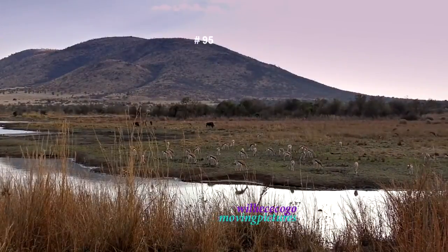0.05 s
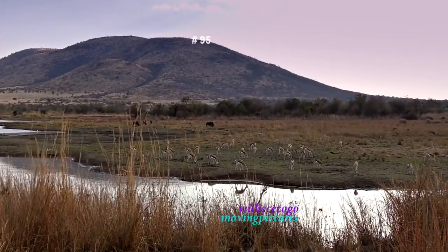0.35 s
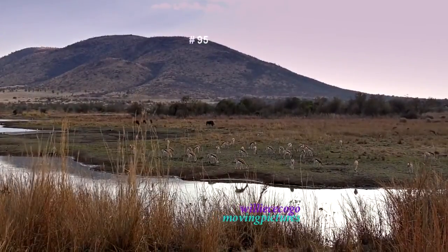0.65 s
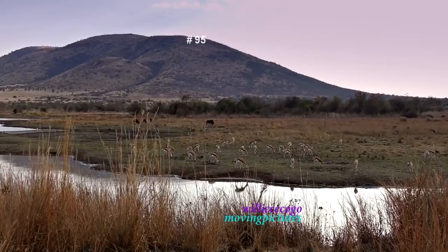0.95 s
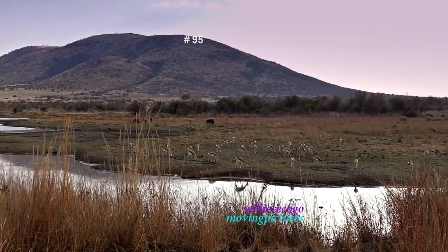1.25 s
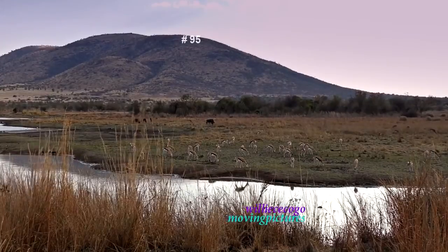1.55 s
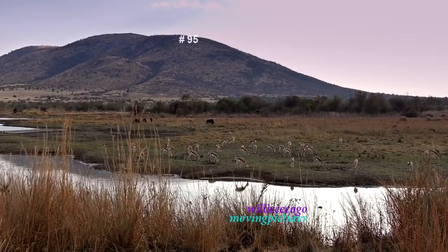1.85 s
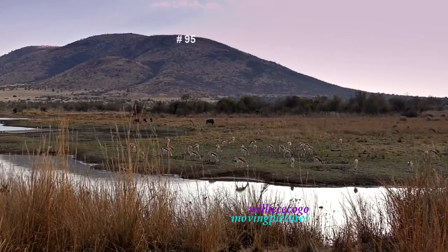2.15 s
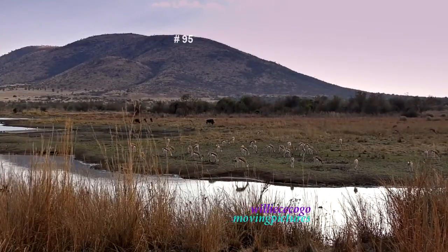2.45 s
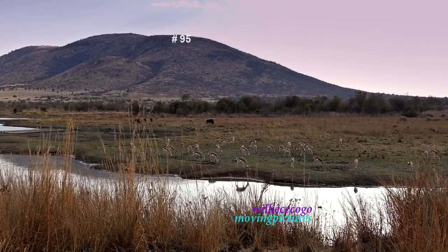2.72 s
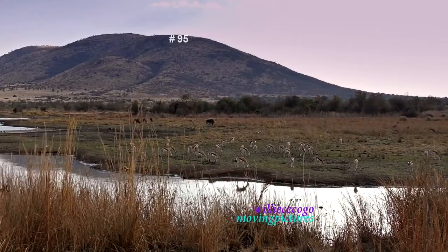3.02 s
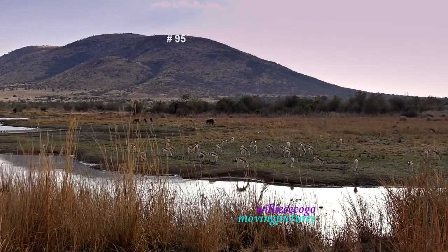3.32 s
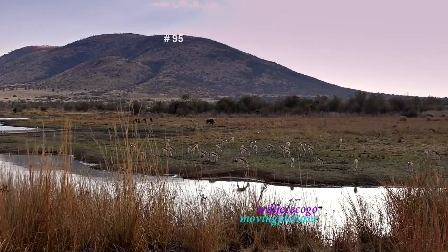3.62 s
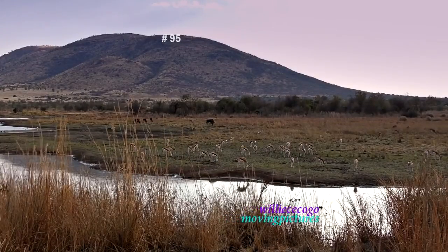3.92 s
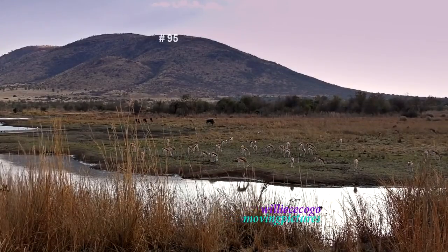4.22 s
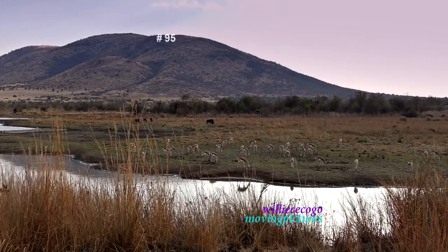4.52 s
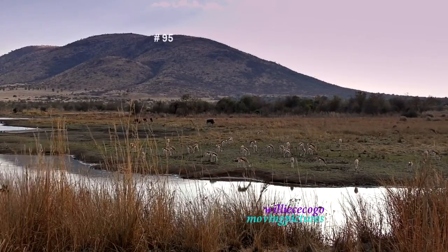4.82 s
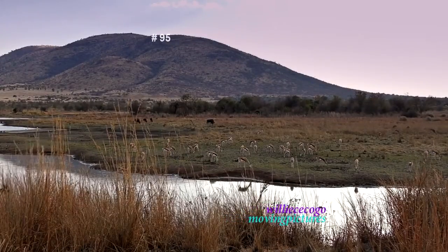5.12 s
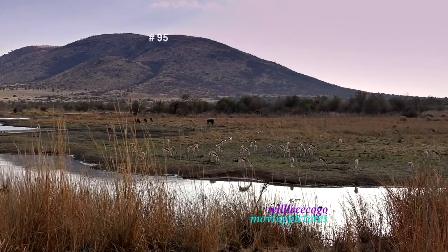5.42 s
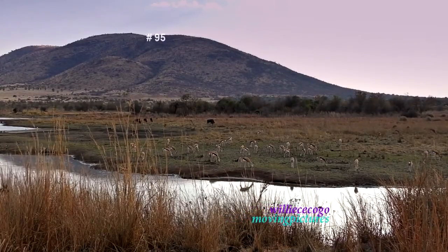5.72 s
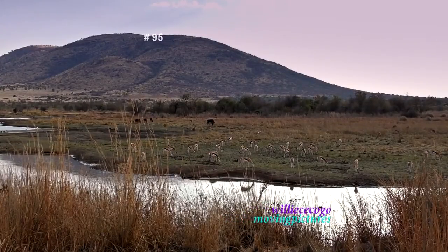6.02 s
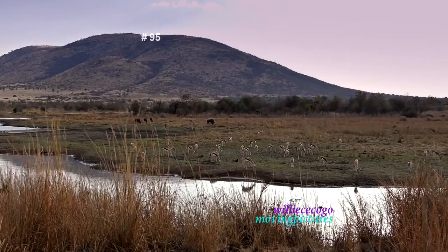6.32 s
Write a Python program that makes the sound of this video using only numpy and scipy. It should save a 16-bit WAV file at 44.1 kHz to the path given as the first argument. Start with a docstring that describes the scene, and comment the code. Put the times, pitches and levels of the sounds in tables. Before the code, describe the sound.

At an open river's edge, a long rising cry starts a loud duet of yelps between two large birds, centred and lightly echoing. After a brief gap they yelp again, then stop. Quieter twitters, chips and trills run behind them, joined by distant whistles and chatter, before fading too. A wide, quiet hush of air lies underneath throughout, with a faint steady drone and a few soft thuds.

```python
"""Two large birds yelp a ringing, overlapping duet across a river. Each voice is a nearly pure syrinx
tone that scoops up, breaks between registers and turns hoarse when the two sides of the syrinx beat.
Behind them a small bird twitters in threes, others chip and whistle, and a marsh chorus trills, then
dies away. The banks throw back a thin echo. Under it all lie open-air hush, a faint steady drone
and a few low thuds."""
import sys
import numpy as np
from scipy import signal
from scipy.fft import rfft, irfft
from scipy.io import wavfile
from scipy.ndimage import uniform_filter1d

SR = 44100
rng = np.random.default_rng(int(sys.argv[2]) if len(sys.argv) > 2 else 0)


def file_out(sig):
    """Save sig as 16-bit WAV at sys.argv[1]."""
    # one column per channel
    cols = np.atleast_2d(sig).T
    # limit, then scale
    lim = np.clip(cols, -1, 1)
    pcm = np.round(lim * 32767).astype(np.int16)
    wavfile.write(sys.argv[1], SR, pcm)


N = 285282
TIME = np.arange(N) / SR


def from_db(db):
    """Decibels to gain."""
    return 10 ** (np.asarray(db) / 20)


def unit(x):
    """Scales to rms 1."""
    return x / np.sqrt(np.mean(x ** 2) + 1e-20)


def at_freq(points, hz):
    """Reads a table on a log-frequency axis."""
    f, value = np.transpose(points)
    return np.interp(np.log(hz + 1), np.log(f + 1), value)


def add(mix, s, sound):
    """Lays a sound into the mix at s seconds."""
    start = round(s * SR)
    part = mix[max(start, 0):max(start + len(sound), 0)]
    part += sound[max(-start, 0):][:len(part)]


def add_chirp(mix, s, length, hz, db, fall, arch=0):
    """A soft-edged whistle centred on s whose pitch falls by the share fall, ever faster if arched."""
    u = np.linspace(-.5, .5, max(int(length * SR), 2))
    phase = 2 * np.pi * np.cumsum(hz * (1 - fall * u - arch * u ** 2)) / SR
    add(mix, s - length / 2, np.sqrt(2) * from_db(db) * np.cos(np.pi * u) ** 2 * np.sin(phase))


def band_noise(centre_hz, width_hz):
    """Noise of rms 1 in a bell-shaped band; centred on zero it is a random wander."""
    hz = np.fft.rfftfreq(N, 1 / SR)
    bell = np.exp(-.5 * ((hz - centre_hz) / width_hz) ** 2)
    return unit(irfft(rfft(rng.standard_normal(N)) * bell, N))


def noise_frames(spectrum, patchy_db):
    """Bin frequencies and two unrelated short-time noise spectra that share drifting patches."""
    hz = np.fft.rfftfreq(2048, 1 / SR)
    a, b, c, d, patches = rng.standard_normal((5, N // 512 + 5, len(hz)))
    patches = unit(uniform_filter1d(uniform_filter1d(patches, size=8, axis=0), size=20, axis=1))
    gain = from_db(at_freq(spectrum, hz) + patchy_db * patches)
    return hz, gain * (a + 1j * b), gain * (c + 1j * d)


def to_sound(frames):
    """Short-time spectra to a signal of rms 1."""
    return unit(signal.istft(np.swapaxes(frames, -1, -2), nperseg=2048, noverlap=1536)[1][..., :N])


# tone colour of the air bed: f/Hz, relative level/dB
HUSH_SPECTRUM = [(15, -48), (25, -12.5), (140, -2.5), (233, -9), (331, -10), (368, -14), (552, -15.5),
                 (614, -21.5), (722, -20.5), (782, -23.5), (1140, -14), (3440, -21.5), (6550, -30),
                 (10600, -27.5), (15500, -28)]
# its stereo width: f/Hz, left-right correlation
HUSH_CORRELATION = [(30, 0.7), (130, 0.25), (300, 0.11), (1300, 0.073), (3000, 0.16), (7000, 0.12),
                    (15000, 0.55)]
# its pan: f/Hz, left over right/dB
HUSH_PAN = [(60, -4), (130, -3.5), (350, -0.5), (700, -5.5), (1290, -2), (2400, 0.5), (4400, 0),
            (8100, -3.5), (15000, -5.5)]

def hush(level_db=-65.5):
    """A wide bed of open-air noise with hiss on top."""
    hz, left, other = noise_frames(HUSH_SPECTRUM, patchy_db=1.0)
    shared = at_freq(HUSH_CORRELATION, hz)
    right = shared * left + np.sqrt(1 - shared ** 2) * other
    pan = from_db(at_freq(HUSH_PAN, hz) / 2)
    return from_db(level_db) * to_sound(np.array([left * pan, right / pan]))


# drone partials: f/Hz, opening level/dB, closing level/dB
DRONE_PARTIALS = [(52, -88.5, -80.5), (96.6, -78.5, -81), (146.3, -87.5, -77), (223.8, -90, -82),
                  (339, -83.5, -101)]

def drone(waver=0.01198, swell_db=3.5):
    """A distant drone of low sines, each wandering in pitch and level."""
    out = np.zeros(N)
    for hz, first_db, last_db in DRONE_PARTIALS:
        phase = 2 * np.pi * np.cumsum(hz * (1 + waver * band_noise(0, 2.67))) / SR
        level = from_db(np.linspace(first_db, last_db, N) + swell_db * band_noise(0, 3.4))
        out += np.sqrt(2) * np.sin(phase) * level
    return out


# tone colour of the chorus wash: f/Hz, relative level/dB
WASH_SPECTRUM = [(100, -16), (300, -2.5), (700, -2), (1500, 0.5), (2200, -5), (3000, -12.5), (3750, -9.5),
                 (4300, 0), (4750, -2), (5150, -19), (6000, -16.5), (6700, -7.5), (7400, -30),
                 (15000, -48.5)]
# fader ride on the whole chorus: t/s, level/dB
MARSH_FADER = [(0, -69.5), (2.5, -71), (4.5, -69.5), (4.95, -74), (5.1, -76.5), (5.22, -100)]

def marsh(spread_db=2.5, chip_s=0.026, fall=0.1585, wash_db=-2, echo_db=-8):
    """Three running trills of tiny falling chips over the wash of many far callers."""
    trills = np.zeros(N)
    for hz, step_s, db in ((4380, 0.056, -5.0), (4470, .046, -9.5), (4190, .055, -4)):
        for k, (late, sharp, loud) in enumerate(rng.standard_normal(size=(130, 3))):
            s = (k + 0.13 * late) * step_s
            add_chirp(trills, s, chip_s, hz * (1 + 0.0087 * sharp), db + spread_db * loud, fall)
    wash = to_sound(noise_frames(WASH_SPECTRUM, patchy_db=2.5)[1])
    fader = from_db(np.interp(TIME, *np.transpose(MARSH_FADER)))
    return (trills + from_db(echo_db) * banks(trills) + from_db(wash_db) * wash) * fader


# breakpoints of a long held cry and a plunging one: t/s, f/Hz, level/dB, octave over fundamental/dB
CRY_CURVES = [
    [(0, 1224, -67.5, -25), (.037, 1370, -52, -21), (.065, 1462, -44.5, -19.5), (.104, 1558, -47.5, -10),
     (.15, 1636, -42, -12.5), (.213, 1680, -39.5, -10), (.335, 1675, -40.5, -6.5), (.401, 1634, -39, -10.5),
     (.414, 1536, -45.5, -14), (.427, 1290, -48.5, -17), (.445, 1134, -70, -2)],
    [(1.029, 1880, -54, -40), (1.036, 1890, -41.5, -42), (1.057, 1763, -39, -35), (1.071, 1518, -40.5, -34),
     (1.091, 1475, -41.5, -38), (1.122, 1570, -53, -34), (1.179, 1520, -58, -36), (1.196, 1354, -55.5, -27),
     (1.204, 1370, -72, -22)],
]

def cries():
    """Yields each loud cry's start and its curves of pitch, gain and brightness."""
    for points in CRY_CURVES:
        s, *columns = np.transpose(points)
        t = np.arange(s[0], s[-1], 1 / SR)
        hz, db, overtone_db = (np.interp(t, s, column) for column in columns)
        yield s[0], hz, from_db(db), overtone_db


# hoarse stretches: start/s, end/s, beat/Hz, phase swing/rad, irregular share
HOARSE_SPANS = [(0.419, 0.455, 189.4, 0.62, 0.7), (.85, 0.92, 380, 0.12, 1), (1.04, 1.067, 260, 0.11, 0.45),
                (1.988, 2.13, 170, 0.21, 1), (3.332, 3.46, 150, 0.24, 0.48),
                (3.645, 3.692, 302, 0.32, 0.17), (3.703, 3.797, 220, 0.11, 0.62),
                (3.783, 3.973, 180, 0.097, .95)]

def syrinx_beat():
    """Phase swing as the two sides of the syrinx beat: sidebands if regular, a rasp if not."""
    swing = np.zeros(N)
    for start, end, hz, depth, irregular in HOARSE_SPANS:
        steady = np.sin(2 * np.pi * hz * TIME)
        rough = band_noise(hz, hz / 2) / np.sqrt(2)
        gate = uniform_filter1d(1. * ((TIME > start) & (TIME < end)), size=200)
        swing += depth * ((1 - irregular) * steady + irregular * rough) * gate
    return swing


# notes between voice breaks: start/s, end/s, mid f/Hz, glide/Hz, arch/Hz, scoop and drop/share of pitch,
# level/dB, swell/dB, attack/s, release/s, octave overtone at top pitch/dB, dulling/dB per semitone down
YELP_NOTES = [(0.769, 0.826, 1055, 153, 40, 0.24, 0.0078, -63.5, 19, 0.003, 0.0033, -33, 3),
              (0.807, 1.207, 1173, 122, 129, 0.054, 0.26, -53.5, 13.5, 0.072, 0.24, -12, -2),
              (0.913, 1.052, 1425, -215, 100, 0.3, 0.0, -38, 0, 0.075, 0.099, -19, 0.5),
              (1.277, 1.318, 1406, 15, -42, 0.36, 0.013, -47.5, 11, 0.025, 0.0048, -44, 3),
              (1.308, 1.46, 1517, -156, 102, 0.0, 0.52, -49, -30, 0.075, 0.018, -49, 3),
              (1.53, 1.561, 1345, 226, -60, 0.13, 0.0, -60.7, 4, 0.024, 0.008, -34, 3),
              (1.551, 1.714, 1193, -168, 210, 0.073, 0.0, -48, -7.5, 0.087, 0.058, -23.5, 6),
              (1.7, 1.755, 1243, -124, -4, 0.017, 0.0, -46.5, -7.5, 0.011, 0.014, -47, 3),
              (1.743, 1.823, 1291, -65, -85, 0.028, 0.0, -55.5, -8, 0.017, 0.073, -42, 5),
              (1.773, 1.8, 1020, -374, 25, 0.058, 0.045, -61.5, -11, 0.003, 0.003, -28, 3),
              (1.829, 1.865, 1270, 236, -11, 0.19, 0.0027, -54.5, 27, 0.003, 0.0053, -27, 3),
              (1.853, 1.893, 1160, 12, 31, 0.014, 0.006, -52.5, 13, 0.009, 0.027, -40, 3),
              (1.858, 1.996, 1571, -81, 101.5, 0.021, 0.0, -48.5, 12, 0.003, 0.021, -13, 22),
              (1.884, 1.928, 1307, 22, 66, 0.017, 0.043, -58, -5, 0.004, 0.023, -38, 3),
              (1.92, 1.939, 990, -79, 112, 0.0088, 0.056, -58, 1, 0.0039, 0.0026, -33, 3),
              (1.985, 2.141, 1607, -370, 43.5, 0.0, 0.51, -55.9, -3, 0.0058, 0.037, -15, 3),
              (2.225, 2.259, 1106, 201, 37, 0.39, 0.021, -60.5, 7, 0.023, 0.0062, -8.5, 2),
              (2.24, 2.439, 929, -84, -7, 0.39, 0.0, -55, 11, 0.034, 0.012, -14, 13),
              (2.258, 2.325, 1424, 71, 5, 0.014, 0.0046, -41.5, 6.5, 0.0034, 0.0078, -42, 3),
              (2.318, 2.403, 1538, -130, 23, 0.027, 0.0, -48.5, -4.5, 0.012, 0.016, -36, 2),
              (2.398, 2.419, 1253, -100, 9, 0.016, 0.0052, -47.5, 4, 0.003, 0.02, -46, 3),
              (2.427, 2.528, 951, -145, -19, 0.0, 0.25, -56.5, -7, 0.003, 0.003, -30, 0),
              (3.138, 3.346, 1519, 325, 165, 0.3, 0.029, -39, 5, 0.14, 0.024, -18.5, 26),
              (3.334, 3.47, 1646, -470, 9, 0.0, 0.37, -58, 6, 0.011, 0.05, -0.5, 5),
              (3.61, 3.667, 1293, 126, 65, 0.15, 0.0028, -50, -1, 0.048, 0.003, -11.5, -4),
              (3.652, 3.711, 1535, -50, -9, 0.0055, 0.0028, -46, 4, 0.012, 0.023, -12.5, 8),
              (3.666, 3.796, 1315, 294, 68.5, 0.042, 0.0047, -47.3, -6, 0.07, 0.0072, -24, 2),
              (3.703, 3.782, 1660, -262, -9, 0.0087, 0.049, -54.5, -8, 0.039, 0.003, 4.5, 11.5),
              (3.786, 3.978, 1166, -279, 132, 0.0, 0.08, -54, -2, 0.005, 0.027, -9, 1),
              (3.975, 4.008, 1083, 174, 77, 0.14, 0.0, -64, -7, 0.003, 0.0027, -9, 0),
              (3.995, 4.169, 1387, -176, 109.5, 0.022, 0.32, -49.5, -15, 0.085, 0.061, -45, 2),
              (4.15, 4.227, 886, 256, 35, 0.2, 0.0, -69.5, 14, 0.003, 0.0034, -10.5, -2.5),
              (4.218, 4.399, 1210, -310, 110, 0.019, 0.099, -54, -15.5, 0.024, 0.019, -34, 0),
              (4.394, 4.428, 686, -130, 0, 0.0095, 0.058, -65.5, -14, 0.0069, 0.016, -7, -2)]

def yelps(scoop_s=0.01, drop_s=0.032, slack_db=-18):
    """Yields each note's start and curves: the syrinx tightens in, and may break to a slack register."""
    for (start, end, mid_hz, glide_hz, arch_hz, scoop, drop,
         db, swell_db, attack_s, release_s, overtone_db, dulling_db) in YELP_NOTES:
        length = end - start
        t = np.arange(0, length, 1 / SR)
        u = t / length - .5
        slack = scoop * np.exp(-t / scoop_s) + drop * np.sqrt(np.clip(1 - (length - t) / drop_s, 0, 1))
        hz = (mid_hz + glide_hz * u - arch_hz * (2 * u) ** 2) * np.maximum(1 - slack, .1)
        semitones_down = 12 * np.log2(hz.max() / hz)
        attack, release = np.sin(np.pi / 2 * np.clip([t / attack_s, (length - t) / release_s], 0, 1))
        level = attack * release * from_db(db + swell_db * u + slack_db * slack)  # a slack voice is weak
        yield start, hz, level, overtone_db - dulling_db * semitones_down


# strain in the voices: t/s, third harmonic over second/dB
VOICE_STRAIN = [(.22, -13), (.38, -22.5), (1.0, -15), (1.6, -9), (1.92, -5), (2.02, -11), (3.3, -18),
                (3.38, -4.5), (3.72, -15), (3.85, -12)]

def duet(jitter=0.00076, wobble=0.0021, wobble_hz=18, shimmer_db=0.7, rasp_db=-41,
         fourth_db=-14, air_hz=5300, fray=2.6, hoarse_flutter=0.48):
    """Voices the cries and yelps as wavering syrinx tones; hoarseness shakes them and frays overtones."""
    out, beat = np.zeros(N), syrinx_beat()
    waver, flutter, rasp, sway = (band_noise(0, width_hz) for width_hz in (110, 55, 450, wobble_hz))
    for start, hz, level, overtone_db in [*cries(), *yelps()]:
        i = round(start * SR) + np.arange(len(hz))
        strain_db = np.interp(i / SR, *np.transpose(VOICE_STRAIN))
        phase = 2 * np.pi * np.cumsum(hz * (1 + jitter * waver[i] + wobble * sway[i])) / SR + beat[i]
        voice = np.sin(phase) * (1 + hoarse_flutter * beat[i])
        for k, step_db in enumerate((0, strain_db, strain_db + fourth_db), 2):
            air = 1 / np.sqrt(1 + (k * hz / air_hz) ** 16)  # distance takes the highest overtones
            voice += air * from_db(overtone_db + step_db) * np.sin(k * phase) * (1 + fray * beat[i])
        grain = from_db(shimmer_db * flutter[i]) * (1 + from_db(rasp_db) * rasp[i])
        out[i] += np.sqrt(2) * voice * level * grain
    return out


# single clear chips: centre t/s, f/Hz, level/dB
CHIP_CUES = [(0.018, 4370, -66.5), (1.57, 4370, -68), (1.671, 4370, -68), (1.971, 4370, -67.5),
             (3.055, 3770, -62.5), (3.085, 3800, -59), (3.509, 4430, -65.5), (4.345, 3620, -68),
             (4.367, 3780, -57), (4.395, 3770, -55), (4.94, 4420, -69), (4.997, 4400, -70)]
# three-chirp twitters: first chirp t/s, level/dB
TWITTER_CUES = [(0.108, -64), (0.534, -64.5), (.902, -67), (1.334, -67.5), (1.755, -68), (2.143, -69.5),
                (2.502, -68.5), (2.87, -69), (3.267, -64.5), (3.637, -68), (3.983, -67.5), (4.395, -68.5),
                (4.795, -66.5)]

def small_birds(chip_s=0.022, chip_fall=0.13, twitter_hz=4760, twitter_s=0.029, step_s=.045,
                flick_hz=4420, flick_delay_s=.014, flick_db=-6):
    """Small birds chip; one twitters in threes, each chirp ending in a weak, steep downward flick."""
    out = np.zeros(N)
    for s, hz, db in CHIP_CUES:
        add_chirp(out, s, chip_s, hz, db, chip_fall, arch=0.3)
    for start, twitter_db in TWITTER_CUES:
        for k, accent_db in enumerate((-1, 1, 1.5)):
            s, db = start + k * step_s, twitter_db + accent_db
            add_chirp(out, s, twitter_s, twitter_hz * rng.normal(1, 0.0041), db, fall=0.066, arch=.18)
            hz = flick_hz * rng.normal(1, .01)
            add_chirp(out, s + flick_delay_s, chip_s, hz, db + flick_db, chip_fall)
    return out


# reverb time of the banks: f/Hz, T60/s
BANK_DECAY = [(500, 0.85), (1500, 1.05), (3000, 0.26), (6000, 0.22)]

def banks(x, taps_per_s=2000, predelay_s=.015):
    """Thin echo scattered back from reeds and river banks."""
    taps = rng.standard_normal(SR) * (rng.random(SR) < taps_per_s / SR) * (TIME[:SR] > predelay_s)
    hz, t, frames = signal.stft(taps, SR, nperseg=256)
    decay = from_db(-60 * t / at_freq(BANK_DECAY, hz)[:, None])
    tail = signal.istft(frames * decay, SR)[1]
    return signal.fftconvolve(x, tail / np.linalg.norm(tail))[:N]


# low thuds and rumbles: centre t/s, length/s, f/Hz, bandwidth/Hz, level/dB
THUD_CUES = [(0.611, 0.62, 149.4, 25, -69.5), (2.82, .8, 69, 135, -69.5), (3.173, 0.089, 64, 40, -63),
             (3.173, 0.15, 126, 50.76, -67), (3.697, 0.13, 104, 71, -62), (6.233, 1, 90.5, 194.4, -70)]

def thuds():
    """Soft swells of low noise: short ones thud, long ones rumble."""
    out = np.zeros(N)
    for s, length, hz, width, db in THUD_CUES:
        swell = np.cos(np.pi * np.clip((TIME - s) / length, -.5, .5)) ** 2
        out += from_db(db) * swell * band_noise(hz, width / 2)
    return out


# faint far whistles: centre t/s, length/s, f/Hz, level/dB
WHISTLE_CUES = [(1.089, .08, 2970, -72.5), (3.843, 0.19, 3050, -77), (4.056, .14, 3030, -76),
                (4.27, 0.16, 3090, -75), (4.413, 0.056, 3020, -71), (4.493, 0.07, 2820, -69.5),
                (4.6, 0.07, 2320, -75)]
# runs of even chatter: t/s, step/s, opening f/Hz, opening level/dB
CHATTER_RUNS = [(4.5, .085, 2500, -79), (4.56, .066, 2800, -78)]

def far_birds(sag_hz_per_s=260, fade_db_per_s=3, scatter=0.041, spread_db=2, burr=0.58, burr_hz=110):
    """Far birds' falling, burry whistles end in a quick chatter that sinks and fades."""
    out = np.zeros(N)
    for s, length, hz, db in WHISTLE_CUES:
        add_chirp(out, s, length, hz, db, fall=0.059)
    for start, step_s, first_hz, first_db in CHATTER_RUNS:
        for k, (late, sharp, loud) in enumerate(rng.standard_normal(size=(8, 3))):
            t = (k + 0.04 * late) * step_s
            hz = (first_hz - sag_hz_per_s * t) * (1 + scatter * sharp)
            db = first_db - fade_db_per_s * t + spread_db * loud
            add_chirp(out, start + t, length=.06, hz=hz, db=db, fall=.13)
    return out * (1 + burr * band_noise(0, burr_hz))


def scene(duet_send_db=-28.5, small_send_db=-15, far_send_db=-9, slap_db=-34, slap_s=0.066):
    """The mix: all the birds sit dead centre with their echo; the hush is all around."""
    near, small, far = duet(), small_birds(), far_birds()
    send = from_db(duet_send_db) * near + from_db(small_send_db) * small + from_db(far_send_db) * far
    echo = banks(send)
    add(echo, slap_s, from_db(slap_db) * near)  # one faint, distinct slap echo of the duet
    return near + small + far + echo + marsh() + drone() + thuds() + hush()


def record(dry, cutoff_hz=15720):
    """A steep high cut on the master."""
    lowpass = signal.firwin(511, cutoff_hz, window=("kaiser", 9), fs=SR)
    return signal.oaconvolve(dry, lowpass[None], "same")


dry = scene()
out = record(dry)
file_out(out)
```